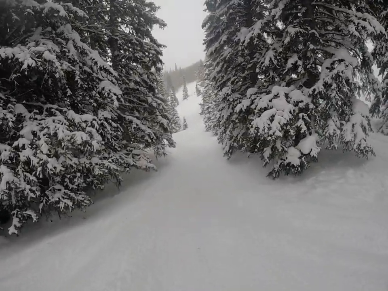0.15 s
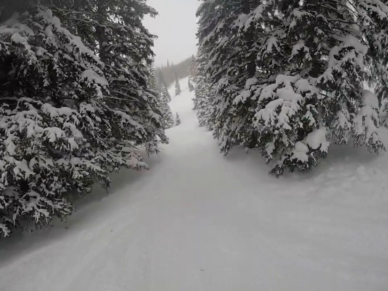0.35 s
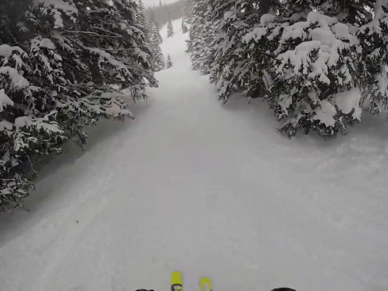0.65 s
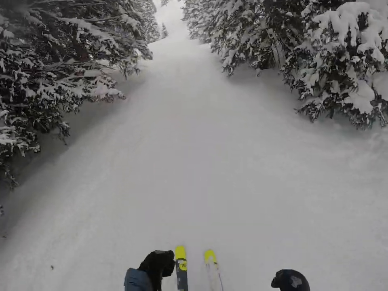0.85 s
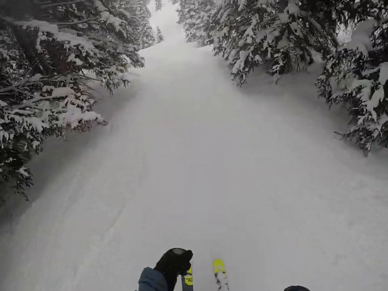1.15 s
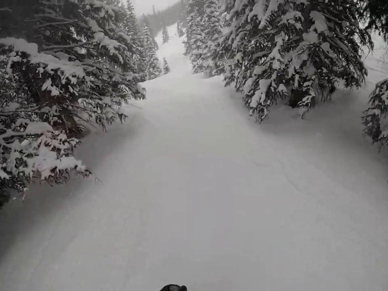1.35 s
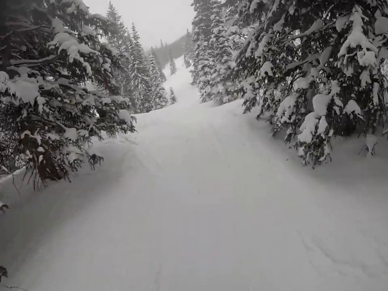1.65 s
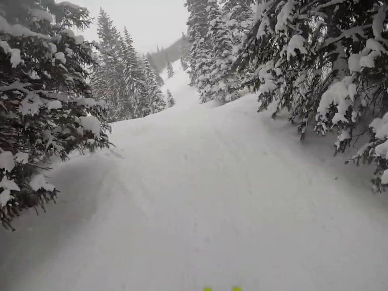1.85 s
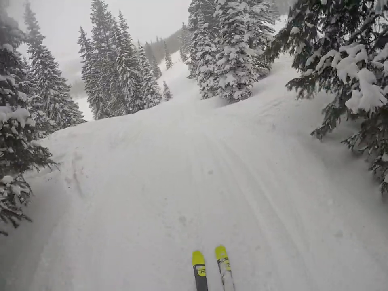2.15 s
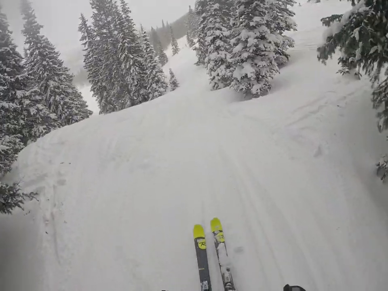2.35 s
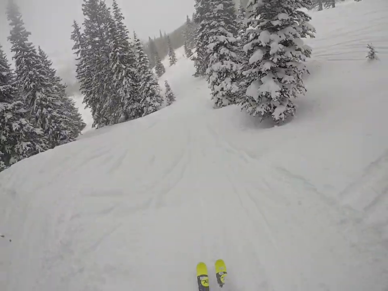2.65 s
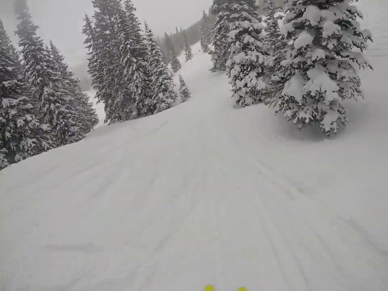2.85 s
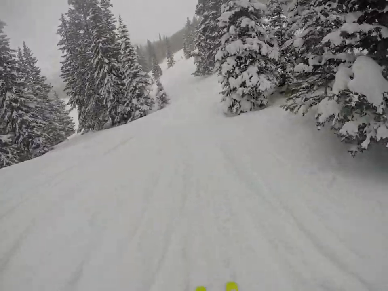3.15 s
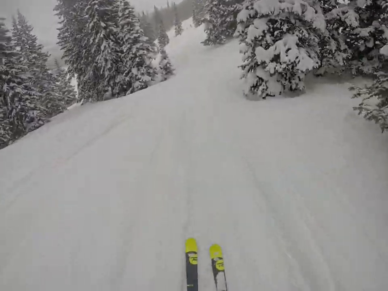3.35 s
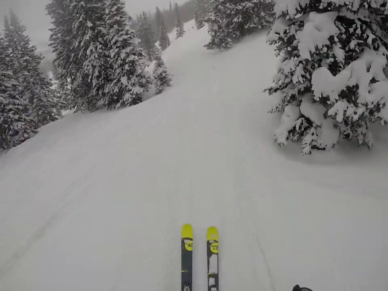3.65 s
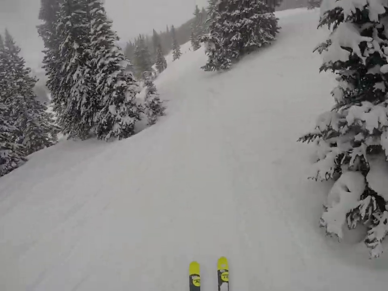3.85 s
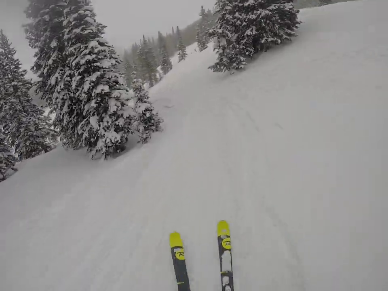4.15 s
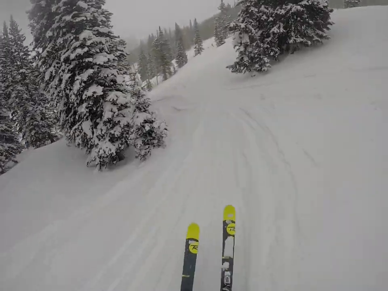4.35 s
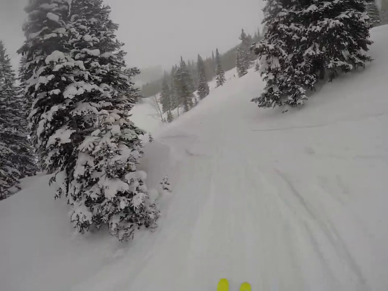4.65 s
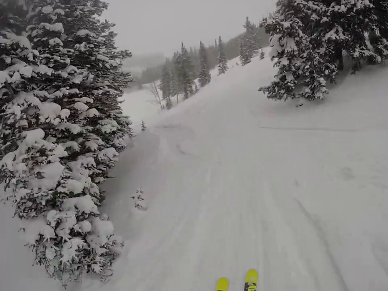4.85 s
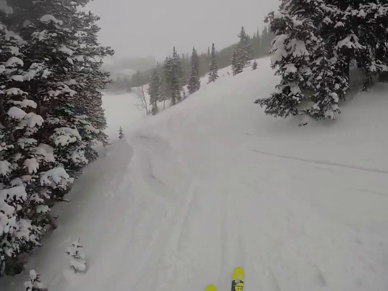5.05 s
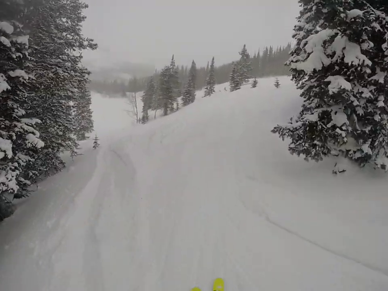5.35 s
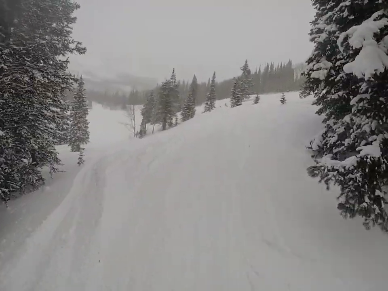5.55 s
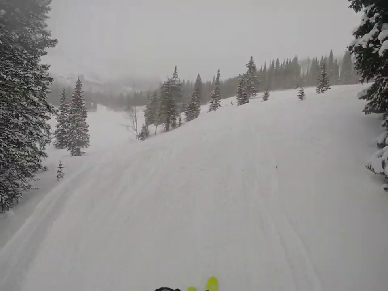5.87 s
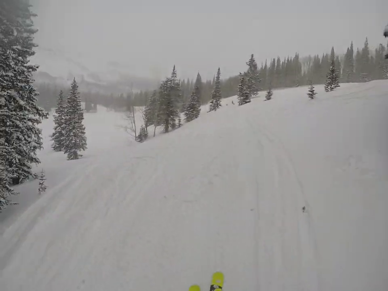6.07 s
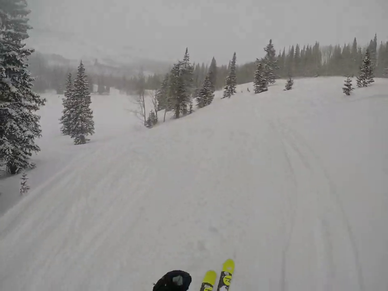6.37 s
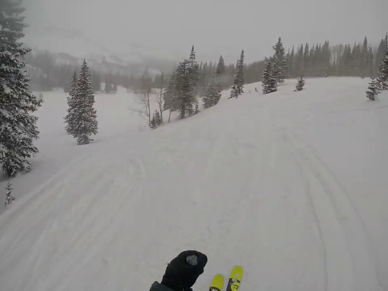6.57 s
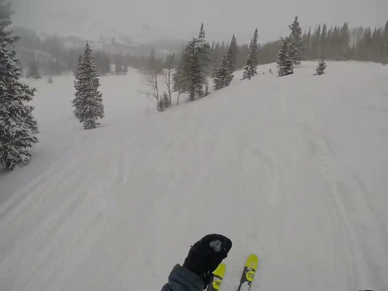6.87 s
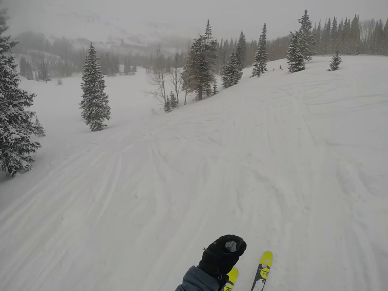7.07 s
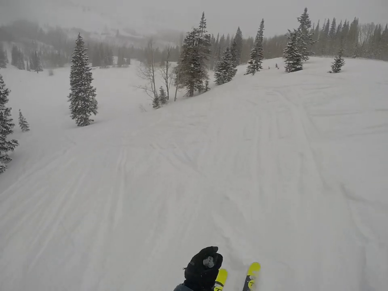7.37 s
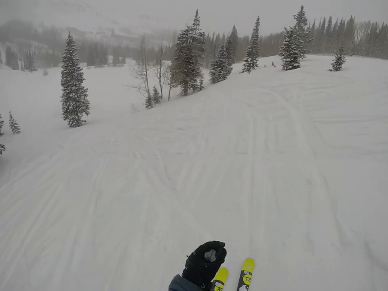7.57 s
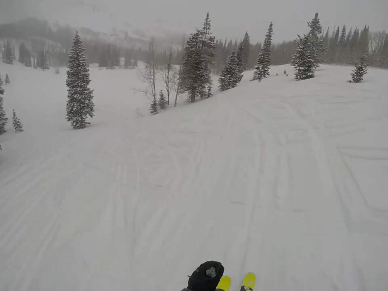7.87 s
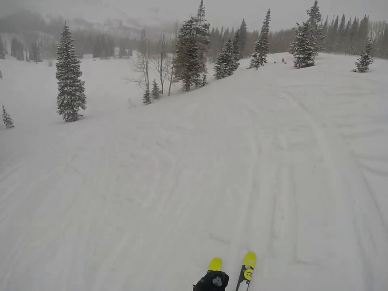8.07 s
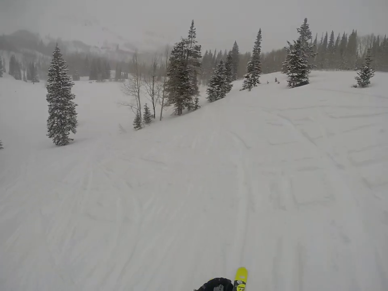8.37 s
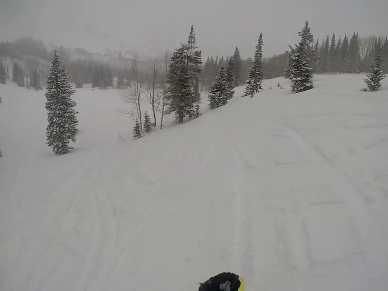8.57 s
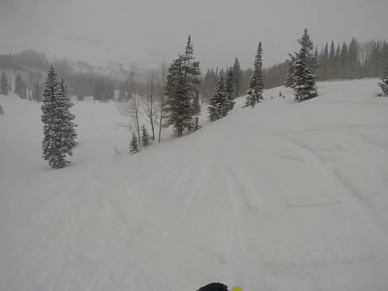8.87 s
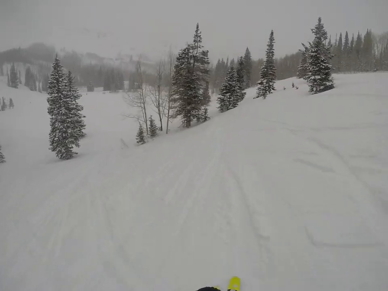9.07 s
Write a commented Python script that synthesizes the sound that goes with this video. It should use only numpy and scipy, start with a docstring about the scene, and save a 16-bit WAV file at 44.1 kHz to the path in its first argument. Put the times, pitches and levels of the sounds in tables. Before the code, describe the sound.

A skier's viewpoint: grainy snow hiss rises and falls, pattered with small plastic ticks, ski clacks and heavy low thumps, before easing off.

```python
"""Among trees in soft snow, a skier glides by turns, heard from a worn camera in a plastic case.
The skis hiss as fluttering noise over a dull packing rush, breaking crust and a faint drone.
Snow ticks on the case as short rings, and skis and bindings chatter and clack as rough tones.
Bumps in the trail swing the camera on its mount, a mass on a spring, with deep thumps.
Wind is low noise that swells round the case, over a faint even rush of air."""
import sys
import numpy as np
from scipy import signal
from scipy.fft import rfft, irfft
from scipy.io import wavfile
from scipy.ndimage import uniform_filter1d

SR = 44100
rng = np.random.default_rng(int(sys.argv[2]) if len(sys.argv) > 2 else 0)


def wav_record(signal):
    """Record a signal, one row per channel, as 16-bit PCM in the file named by sys.argv[1]."""
    frames = np.transpose(np.atleast_2d(signal))
    bounded = np.clip(frames, -1, 1)
    # unit amplitude maps onto the largest positive 16-bit level
    quanta = np.round(bounded * 32767).astype(np.int16)
    wavfile.write(sys.argv[1], SR, quanta)


N = 406602
TIME = np.arange(N) / SR  # seconds
BINS = np.fft.rfftfreq(N, 1 / SR)  # Hz
FULL_DB = -44  # reference level of a hard turn


def amp(db):
    """Decibels to gain."""
    return 10 ** (np.asarray(db) / 20)


def unit(x):
    """Scales to rms 1."""
    return x / np.sqrt(np.mean(x ** 2) + 1e-20)


def noise():
    """White noise of rms about 1 for the whole scene."""
    return rng.standard_normal(N)


def read(points, hz):
    """A spectrum in dB, joined by straight lines over log frequency."""
    f, db = np.transpose(points)
    return np.interp(np.log(hz + 1), np.log(f + 1), db)


def curve(rows):
    """The level column of a control table at every sample."""
    s, db = np.transpose(rows)
    return np.interp(TIME, s, db)


def add(mix, s, sound):
    """Mixes a sound in at time s."""
    part = mix[max(round(s * SR), 0):][:len(sound)]
    part += sound[:len(part)]


def wander(rate_hz):
    """Random motion of rms 1 that fades out above the given rate."""
    return unit(irfft(rfft(noise()) / (1 + (BINS / rate_hz) ** 4), N))


# Narrow rings of the case. Each row: frequency in Hz, width in Hz, lift in dB.
CASE_RINGS = [(764, 30, 3.5), (1416, 61, 3.5), (2182, 200, 4.5)]


def through_case(x, spectrum):
    """Colours a source and adds the narrow rings of the case; rms 1."""
    rings_db = sum(db / (1 + (2 * (BINS - hz) / width) ** 2) for hz, width, db in CASE_RINGS)
    return unit(irfft(rfft(x) * amp(read(spectrum, BINS) + rings_db), N))


# How hard the skis work: they gather speed, swell with each turn between the trees, then run out flat.
# Each row: time in seconds, hiss level in dB before the trims of each layer.
GLIDE = [(0.0, -73), (0.72, -55.4), (1.0, -57.1), (1.6, -46.5), (2.1, -44), (2.42, -50.5), (3.22, -43),
         (3.58, -48), (4.0, -45.5), (4.48, -49.5), (4.8, -47), (5.05, -48), (5.3, -46), (5.9, -49),
         (6.1, -52), (7.1, -63), (7.7, -67), (9.22, -66)]


def effort_db():
    """How hard the skis work the snow, in dB relative to a hard turn."""
    return curve(GLIDE) - FULL_DB


# Colour of the hiss of shearing crystals. Each row: frequency in Hz, relative density in dB per Hz.
HISS_SPECTRUM = [(330, -34), (690, -18.5), (1130, -6.5), (1670, -7), (1850, 0), (2270, -1.2), (2890, -0.5),
                 (3120, -8), (3430, -3.5), (3730, -11), (4140, -33), (6150, -48)]
# Colour of the brighter powder fizz. Each row: frequency in Hz, relative density in dB per Hz.
FIZZ_SPECTRUM = [(2560, -17), (4060, -1.5), (4630, -2.5), (5330, 3.5), (5780, 7), (6170, -1), (6830, -5),
                 (7630, -12.5), (8430, -15.5), (9110, -3), (10300, -24), (13000, -15), (15000, -32),
                 (15600, -36)]


def skis(hiss_db=-0.4, fizz_db=-10.0, fizz_follow=1.44, flutter_db=1.0, flutter_hz=24,
         grain_db=1.5, grain_hz=1100, patch_db=1.07, patch_hz=14, count=12):
    """Countless crystals shear; pressure and colour flutter with the surface, hard turns raise more powder."""
    effort = effort_db()
    pressure = amp(FULL_DB + flutter_db * wander(flutter_hz))
    shear = noise() * amp(grain_db * wander(grain_hz))
    powder = noise() * amp(grain_db * wander(grain_hz))
    hiss = amp(hiss_db + effort) * through_case(shear, HISS_SPECTRUM)
    # the fizz gains fizz_follow dB for each dB of hiss
    fizz = amp(fizz_db + fizz_follow * effort) * through_case(powder, FIZZ_SPECTRUM)
    # patches of coarser and finer snow vary each band on its own
    spectrum = rfft(hiss + fizz)
    centres = np.geomspace(1000, 10000, count)
    patched = np.zeros(N)
    for share in np.eye(count):
        band = irfft(spectrum * np.interp(BINS, centres, share), N)
        patched += band * amp(patch_db * wander(patch_hz))
    return pressure * patched


# Soft snow packing under the skis. Each row: time in seconds, level in dB before the trim.
PACKING = [(0.0, -65.5), (2.0, -56), (2.41, -58), (3.88, -54.5), (4.67, -60.5), (5.24, -57), (6.75, -65.5),
           (9.22, -67.5)]
# Dull colour of pressed snow, also heard in the jolts.
# Each row: frequency in Hz, relative density in dB per Hz.
CRUSH_SPECTRUM = [(64, 8), (114, -6), (215, 5), (310, 1.2), (460, -1.5), (715, -7.5), (1250, -6.5),
                  (1750, -8), (2600, -35), (5150, -58)]


def packing(trim_db=2, lump_db=0.74, lump_hz=22):
    """The dull rush of soft snow being pressed down, uneven with its lumps."""
    level = amp(curve(PACKING) + trim_db + lump_db * wander(lump_hz))
    return level * through_case(noise(), CRUSH_SPECTRUM)


# Colour of small crusts breaking. Each row: frequency in Hz, relative density in dB per Hz.
CRUNCH_SPECTRUM = [(510, -21), (1210, -6.5), (2110, -1), (2710, -3.5), (3140, -9), (3460, 1.5), (4010, -22),
                   (5300, 1), (7700, -14), (14100, -32)]


def crunch(level_db=-56.0, per_s=45, spread_db=2.5, follow=0.61, crumble_s=0.0027, size=1200):
    """Bits of crust give way under the skis, each as a brief decaying burst of noise."""
    strength = amp(spread_db * np.minimum(rng.exponential(1, N), 3))
    breaks = (rng.random(N) < per_s / SR) * strength
    decay = np.exp(-np.arange(size) / SR / crumble_s)
    bursts = signal.oaconvolve(breaks, decay)[:N] * noise()
    return amp(level_db + follow * effort_db()) * through_case(bursts, CRUNCH_SPECTRUM)


def flex(level_db=-55, follow=0.9, hz=138, width_hz=36):
    """The skis drone faintly in a bending mode, the more the harder they work."""
    drone = irfft(rfft(noise()) / (1 + (2 * (BINS - hz) / width_hz) ** 2), N)
    return amp(level_db + follow * effort_db()) * unit(drone)


def knock(hz, rise_s=0.0011, rattle=0.92, size=900):
    """A ring of a few milliseconds, roughened by a wandering phase; its envelope peaks at 1."""
    t = np.arange(size) / SR
    envelope = t / rise_s * np.exp(1 - t / rise_s)
    wobble = uniform_filter1d(uniform_filter1d(rng.standard_normal(size), size=32), size=12)
    return envelope * np.sin(2 * np.pi * hz * t + rattle * unit(wobble))


def chatter(level_db=-44, per_s=26, spread_db=2.4, follow=0.41, ring_hz=2600, scatter_hz=330):
    """The skis keep knocking lightly on the uneven snow, each time with another ring."""
    lands = rng.random(N) < per_s / SR
    strength = amp(level_db + follow * effort_db() + spread_db * rng.standard_normal(N))
    hz = ring_hz + scatter_hz * rng.standard_normal(N)
    out = np.zeros(N)
    for i in np.flatnonzero(lands):
        add(out, i / SR, strength[i] * knock(hz[i]))
    return out


# Skis and bindings clacking.
# Each row: start in seconds, peak level in dB before the trim, ring frequency in Hz.
CLACKS = [(2.034, -43, 2840), (3.1458, -29, 2460), (3.4158, -28, 2810), (3.4448, -33.5, 2410),
          (5.407, -30, 2260), (5.891, -34, 2520), (6.327, -37, 2870), (6.8452, -42, 2700),
          (7.2164, -46, 2880), (7.9686, -44.5, 2330), (8.1328, -43, 2660), (8.199, -46.5, 2250),
          (8.9168, -47, 2220), (8.9305, -41, 1970)]


def clacks(trim_db=1.5):
    """The louder knocks of skis and bindings, each a rough ring."""
    out = np.zeros(N)
    for s, db, hz in CLACKS:
        add(out, s, amp(db + trim_db) * knock(hz))
    return out


# Jolts of the camera.
# Each row: time of the push in seconds, peak of the swing in dB, time the push takes to build in seconds.
JOLTS = [(.807, -34, 0.0085), (1.108, -33.5, .009), (1.766, -32, 0.007), (2.079, -23.5, 0.0043),
         (2.232, -22.5, .008), (2.264, -17, .006), (2.859, -24, 0.017), (3.153, -9.5, 0.0072),
         (3.468, -25, 0.021), (4.03, -11.4, 0.004), (4.188, -16.5, 0.0033), (4.698, -22.5, 0.018),
         (4.839, -22.5, .014), (5.442, -30.5, .01), (5.958, -33.5, .012), (7.929, -35, 0.012),
         (8.569, -40.5, 0.012)]


def jolts(mount_hz=43, mount_width_hz=15.5, sway_hz=33, top_hz=300, release_s=0.036,
          rebound_s=0.034, rebound_db=-12, thud_db=-33, thud_s=0.035, thud_follow=1.37,
          wake_db=-17, wake_s=0.17):
    """A push builds, lets go and rebounds with a soft snow thud; the camera swings and stirs the air."""
    lead = 1 / 10  # seconds of build-up kept before the push peaks
    t = np.arange(SR) / SR - lead
    age = np.maximum(t, 0)
    hz = np.fft.rfftfreq(len(t), 1 / SR)
    # a mass on a spring: fast pushes pass, slow ones only sway it
    mount = (-hz ** 2 + 1j * hz * sway_hz) / (mount_hz ** 2 - hz ** 2 + 1j * hz * mount_width_hz)
    rebound = 1 - amp(rebound_db) * np.exp(-2j * np.pi * hz * rebound_s)
    response = rebound * mount / (1 + (hz / top_hz) ** 2)
    stir = np.exp(-age / wake_s) - np.exp(-age / release_s)
    swings, load, wake = np.zeros((3, N))
    for s, db, build_s in JOLTS:
        push = np.exp(-abs(t) / np.where(t < 0, build_s, release_s))
        press = np.exp(-abs(t) / np.where(t < 0, build_s, thud_s))
        swing = irfft(rfft(push) * response, len(t))
        add(swings, s - lead, amp(db) * swing / abs(swing).max())
        add(load, s - lead, amp(thud_follow * db) * press)
        add(wake, s - lead, amp(db) * stir)
    thuds = amp(thud_db) * load * through_case(noise(), CRUSH_SPECTRUM)
    stirred_air = amp(wake_db) * wake * through_case(noise(), BUFFET_SPECTRUM)
    return swings + thuds + stirred_air


# Colour of snow striking the case. Each row: frequency in Hz, relative level in dB.
TICK_SPECTRUM = [(210, -14), (920, -38), (1650, -17), (2520, -3.5), (2980, -5.5), (3680, -10.5),
                 (4540, 0.5), (5060, 2), (6020, -6), (6720, -5), (7780, -16), (9480, -11), (11100, -16),
                 (14900, -22)]


def tick(bright_db, spot_db=3.0, copy_gain=0.22, scatter_s=0.000726, size=1024, count=4):
    """A tick on the case: a short ring, softened by weak random copies just before and after it; energy 1."""
    hz = np.fft.rfftfreq(size, 1 / SR)
    spot = unit(uniform_filter1d(rng.standard_normal(len(hz)), size=22))  # colour of the spot struck
    hardness = np.clip((hz - 5400) / 4300, 0, 1)  # small hard grains reach the top octave
    log_gain = np.log(amp(read(TICK_SPECTRUM, hz) + bright_db * hardness + spot_db * spot))
    # minimum phase: the ring itself starts at once and dies away
    mirrored = np.r_[log_gain, log_gain[-2:0:-1]]
    ring = np.exp(np.conj(signal.hilbert(mirrored)))[:len(hz)]
    weight, delay = rng.standard_normal((2, count))
    softening = 1 + copy_gain * weight @ np.exp(-2j * np.pi * np.outer(scatter_s * delay, hz))
    sound = np.roll(irfft(ring * softening, size), size // 2)  # the ring starts in the middle
    return sound / np.linalg.norm(sound)


# The largest lumps of snow striking the case.
# Each row: start in seconds, level in dB and top-octave tilt in dB, both before their trims.
LUMPS = [(0.6749, -35, -13), (0.817, -35, -22), (0.8986, -31.5, -25), (1.4704, -30.5, -22),
         (1.5351, -26, -23), (1.6422, -27, -20), (1.8642, -26, -34), (1.9982, -26.5, -33),
         (2.0475, -22, -23), (2.1796, -26.5, -34), (2.581, -29.5, -26), (2.7679, -27.5, -34),
         (3.245, -23.5, -20), (4.0272, -20, -29), (4.583, -30, -20), (4.813, -22, -23), (4.823, -29, -24),
         (5.094, -24.5, -43), (5.1172, -25.5, -20), (5.4949, -30, -18), (5.595, -21.5, -25),
         (5.8426, -23.5, -31), (5.9011, -24.5, -17), (5.9045, -23, -42), (5.9162, -26, -27),
         (5.9755, -24.5, -28), (6.1943, -27.5, -28), (6.3794, -32.5, -42), (6.4448, -29.5, -33),
         (6.6182, -30.5, -35), (6.6345, -33.5, -22), (6.699, -27.5, -24), (6.7488, -32.5, -25),
         (6.8668, -35, -25), (7.2175, -37, -19), (7.3141, -31.5, -21), (7.395, -38, -19),
         (7.8545, -37, -22), (7.8865, -39, -28), (7.9374, -41, -26), (8.4295, -34.5, -32),
         (8.4528, -36, -14), (8.568, -31, -24), (8.868, -36.5, -17), (8.9906, -31.5, -21.5),
         (9.1094, -32, -19)]


def grains(trim_db=10.5, bright_trim_db=22, lag_s=0.0011):
    """The largest lumps, each a distinct tick whose ring sets in just after its listed start."""
    out = np.zeros(N)
    for s, db, top_db in LUMPS:
        sound = tick(top_db + bright_trim_db)
        add(out, s + lag_s - len(sound) / 2 / SR, amp(db + trim_db) * sound)
    return out


# How much snow flies at the case. Each row: time in seconds, amount in dB.
FLYING = [(0, -16.5), (1.2, -15), (1.9, 1), (2.5, -6.5), (3.7, -5), (4.7, -1.5), (5.9, -3), (7.0, -15),
          (9.22, -13)]


def patter(level_db, slow_per_s, fast_per_s, spread_db, bright_db, vary_db, bunch_db,
           follow=0.57, bunch_hz=14, count=40):
    """Snow lands on the case in flurries, thicker and harder the more of it is in the air."""
    flying_db = curve(FLYING)
    flurries = unit(amp(bunch_db * wander(bunch_hz)))
    rate = (slow_per_s + fast_per_s * amp(flying_db)) * flurries  # landings per second
    strength = amp(level_db + follow * flying_db + spread_db * np.minimum(rng.exponential(1, N), 3))
    lands = rng.random(N) < rate / SR
    spot = rng.integers(0, count, N)
    rings = [tick(bright_db + vary_db * rng.standard_normal()) for _ in range(count)]
    out = np.zeros(N)
    for i in np.flatnonzero(lands):
        add(out, i / SR, strength[i] * rings[spot[i]])
    return out


def spray():
    """Thrown snow: many fine hard grains and a few softer clumps."""
    fine = patter(level_db=-40, slow_per_s=70, fast_per_s=150, spread_db=4.5,
                  bright_db=8.5, vary_db=1.5, bunch_db=5.5)
    clumps = patter(level_db=-25.5, slow_per_s=1, fast_per_s=32, spread_db=3.0,
                    bright_db=2.5, vary_db=0.5, bunch_db=4)
    return fine + clumps


# Wind on the case. Each row: time in seconds, level in dB before the trim.
WIND = [(0, -59.5), (0.85, -50.5), (1.3, -51.5), (2.1, -39), (2.55, -48.5), (3.0, -44), (3.3, -35.5),
        (3.7, -42.5), (4.25, -44), (4.5, -50), (5.1, -50.5), (6.0, -45), (7.0, -51.5), (7.6, -47),
        (8.4, -56), (8.85, -51.5)]
# Low colour of the eddies, also heard in the air stirred by jolts.
# Each row: frequency in Hz, relative density in dB per Hz.
BUFFET_SPECTRUM = [(5, 5.5), (11, 3.5), (23, -2), (47, 1), (55, -3), (71, -23), (102, -26.5), (205, -37),
                   (510, -65.5)]
# Colour of the even rush of air. Each row: frequency in Hz, relative density in dB per Hz.
AIR_SPECTRUM = [(135, 9.5), (265, -3), (545, 5), (1570, -2), (2170, -5), (4070, -5.5), (7160, -11.5),
                (10160, -16), (14750, -19), (15650, -33)]


def wind(trim_db=5, gust_db=1.0, gust_hz=8, air_db=-64):
    """Eddies push on the case as low noise, over a faint even rush of air."""
    level = amp(curve(WIND) + trim_db + gust_db * wander(gust_hz))
    eddies = level * through_case(noise(), BUFFET_SPECTRUM)
    air = amp(air_db) * through_case(noise(), AIR_SPECTRUM)
    return eddies + air


def scene():
    """Everything as it reaches the one microphone."""
    snow = skis() + packing() + crunch()
    gear = flex() + chatter() + clacks()
    case = jolts() + grains() + spray() + wind()
    return (snow + gear + case)[None]


def record(dry, edge_hz=15700):
    """The recorder's band limit, a steep low-pass filter."""
    low_pass = signal.firwin(511, edge_hz, window=("kaiser", 9), fs=SR)
    return signal.oaconvolve(dry, low_pass[None], "same")


dry = scene()
out = record(dry)
wav_record(out)
```